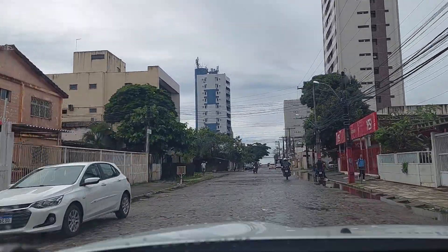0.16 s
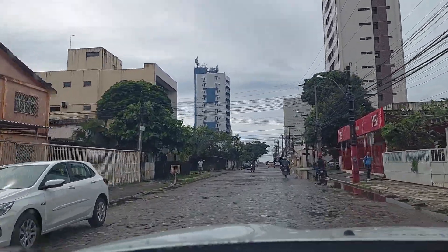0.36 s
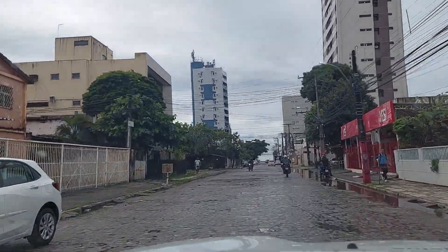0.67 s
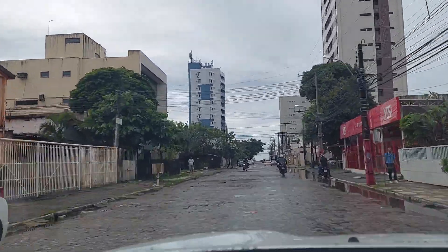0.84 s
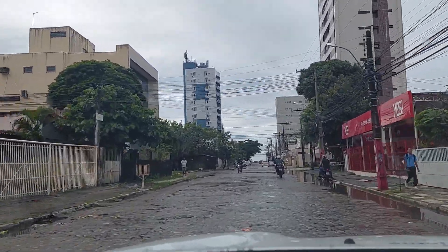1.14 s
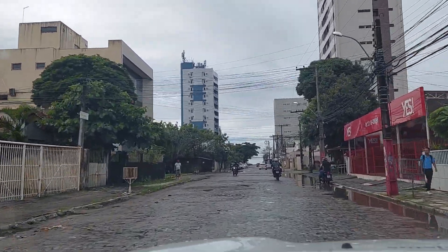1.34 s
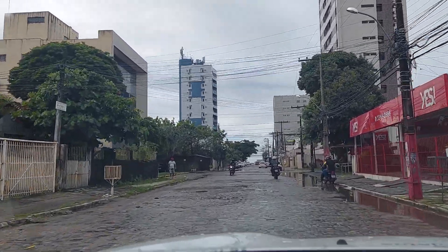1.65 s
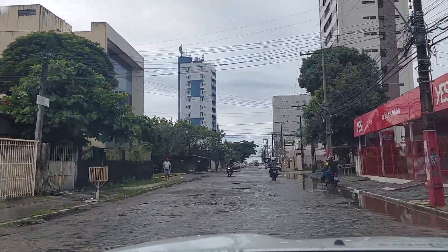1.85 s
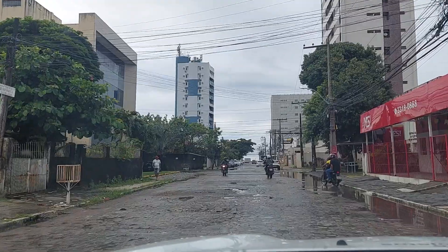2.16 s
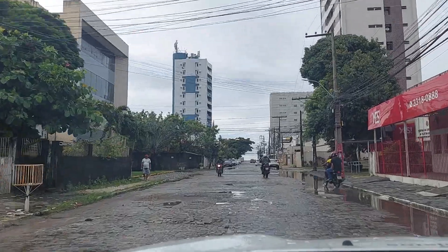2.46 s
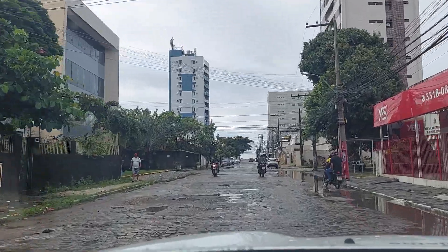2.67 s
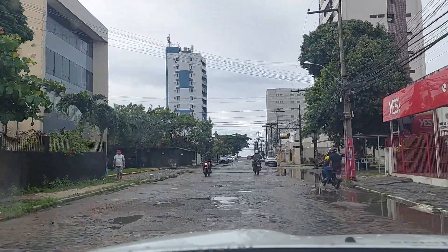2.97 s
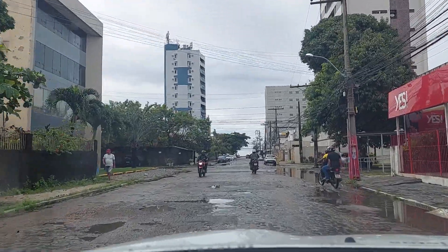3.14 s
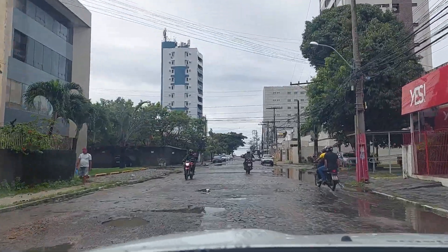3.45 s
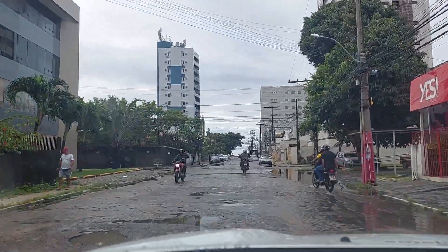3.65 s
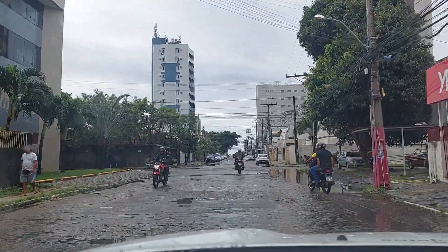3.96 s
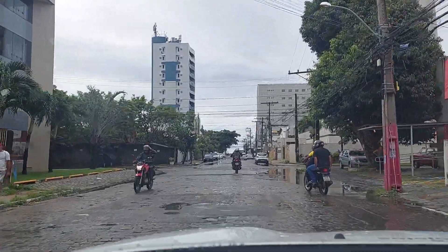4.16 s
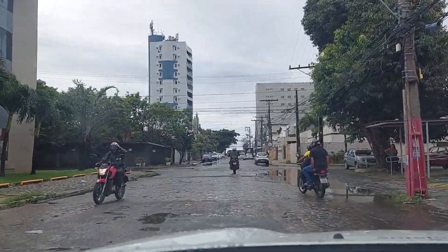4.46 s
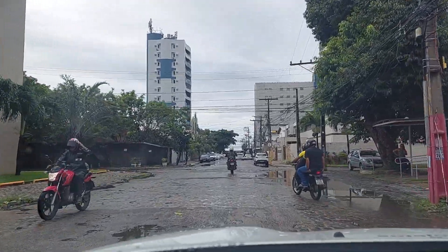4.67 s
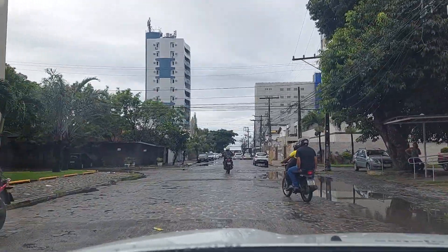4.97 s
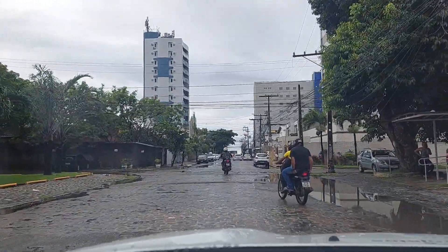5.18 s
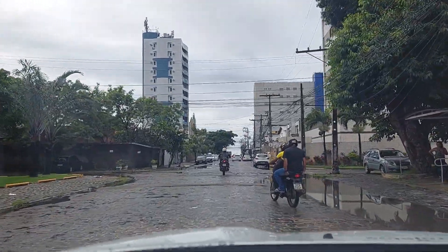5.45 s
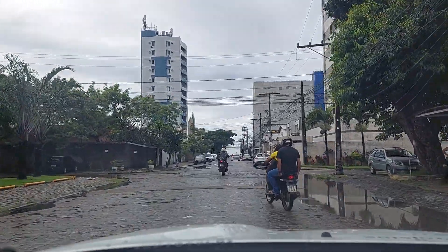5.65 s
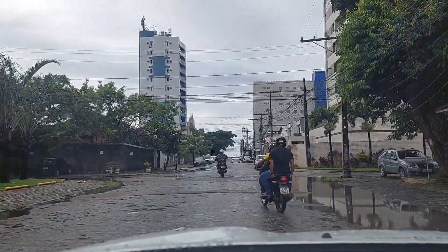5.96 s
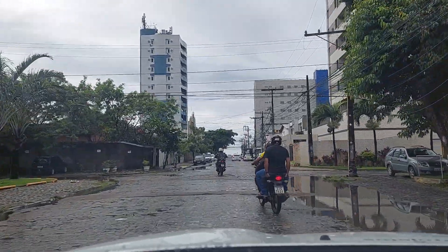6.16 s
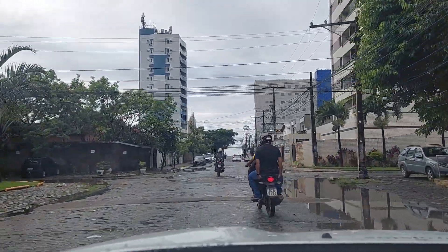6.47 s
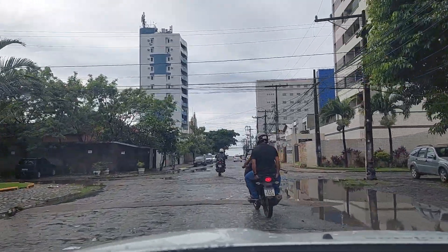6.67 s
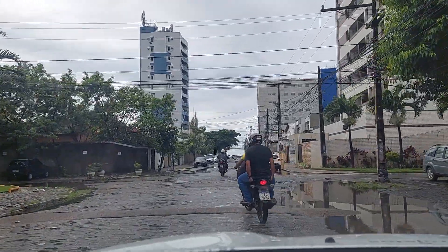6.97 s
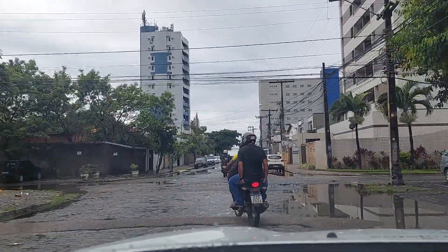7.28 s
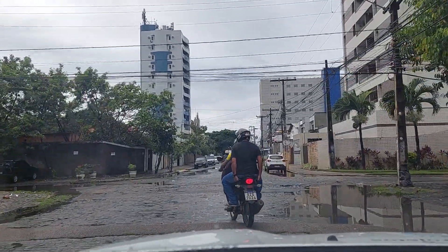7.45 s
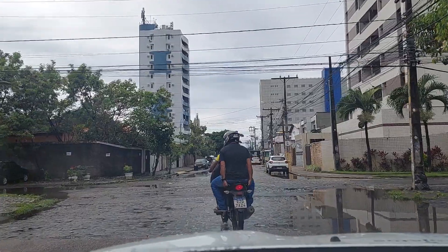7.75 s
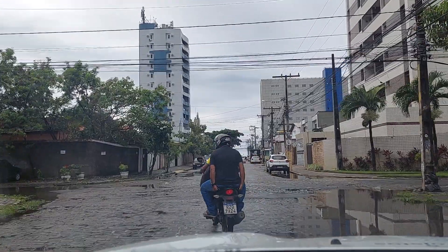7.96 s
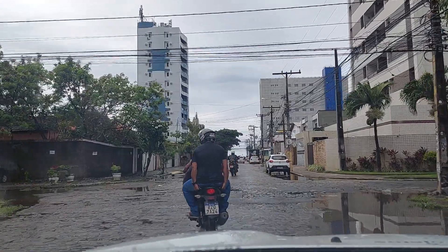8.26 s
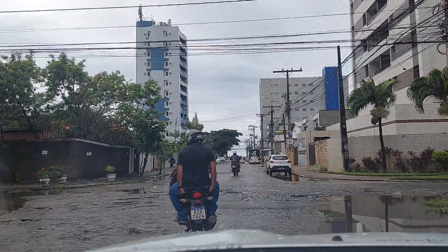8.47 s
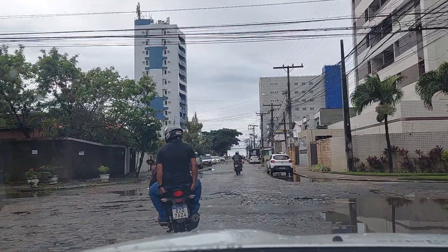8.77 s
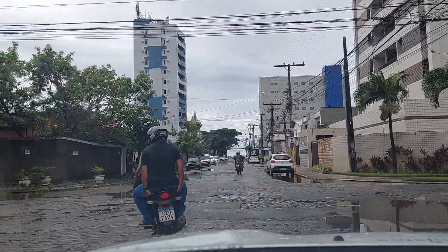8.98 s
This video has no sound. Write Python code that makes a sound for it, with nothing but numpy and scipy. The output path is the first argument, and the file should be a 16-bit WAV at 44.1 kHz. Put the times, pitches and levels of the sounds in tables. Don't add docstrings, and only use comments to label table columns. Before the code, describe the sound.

Close stereo perspective behind the windscreen of a car rolling slowly over wet cobblestones, with a short, dry upholstered cabin response. Throughout, a wavering air boom around 45-50 hertz surges irregularly beneath bumpy tyre rumble and panel drumming; panels briefly hum at low pitches. Faint vent air sits behind. It opens rough, with a hard suspension thump at 0.05 s and crackling trim. A strong plastic knock comes at 0.75, a small bright key ping at 0.98, a softer thump at 1.3. From 2 to 4.6 s short buzzing rattles, taps and clip ticks continue, with a panel clunk at 2.6, a thump at 3.35 and clustered knocks around 4.2. After 5 s it eases, with a sharper knock at 5.56 and a buzz near 6. Knocks cluster at 7.6-7.8, the heaviest thump follows at 7.9, a clunk at 8.3, then quieter rolling and a faint puddle splash at 9.0.

```python
import sys
import numpy as np
from scipy import signal
from scipy.fft import rfft, irfft
from scipy.io import wavfile
from scipy.ndimage import uniform_filter1d

SR = 44100
rng = np.random.default_rng(int(sys.argv[2]) if len(sys.argv) > 2 else 0)


def wav_record(signal):
    frames = np.transpose(np.atleast_2d(signal))
    bounded = np.clip(frames, -1, 1)
    quanta = np.round(bounded * 32767).astype(np.int16)
    wavfile.write(sys.argv[1], SR, quanta)


def level_to_linear(level):
    exponent = np.asarray(level, float) / 20
    return 10 ** exponent


N = 402191
T = np.arange(N) / SR

# (time [s], level [dB])
SPEED = [
    (0, 0.5),
    (1.0, -1.5),
    (2.0, -0.5),
    (4.1, -1),
    (5.3, -3.5),
    (7.4, -2.5),
    (9.12, -3.5),
]
# (time [s], level [dB])
ROUGH = [(0, 11), (.2, -7.5), (.55, 3.5), (.8, 2.5), (1.07, -3.5), (1.5, 4), (2.0, -2.5), (2.64, -2),
         (2.87, -1), (3.5, -2), (4.4, -1.5), (5.05, -8), (5.5, -3), (7.0, -9.5), (7.74, -1), (8.45, -14),
         (8.92, -10), (9.12, 2)]
# (time [s], rumble change [dB], drumming change [dB])
JOLTS = [(.02, 5.5, 4), (.23, -8, -1), (.46, 2, -2), (1.331, 2, 3.5), (2.03, 1.5, -0.5), (3.33, 2.5, -2),
         (4.14, -8.5, -1), (4.818, -1.5, 3.5), (5.5, -1, 4.5), (5.87, 3, 2.5), (6.05, 1.5, 2.5),
         (6.581, 2.5, 0.5), (6.711, 6.5, 2.5), (7.151, 0.5, 2.5), (7.65, 2, 2.5), (7.899, 5, 1.5),
         (8.95, -2.5, 4.5)]
# (start [s], length [s], buzz change [dB])
CHATTER = [(1.409, 0.099, 3.5), (2.139, 0.08, 10), (2.614, 0.065, 8.5), (3.006, 0.049, 8),
           (4.208, 0.071, -9), (4.276, 0.075, 7.5), (4.493, 0.043, 8), (4.653, 0.094, -4),
           (5.188, 0.098, -11.5), (5.97, 0.29, 4.5), (7.451, 0.1293, -11), (7.554, 0.113, 5),
           (7.814, 0.087, 3), (2.701, 0.078, -6.5), (8.408, 0.052, 2), (0.989, 0.052, 5)]
# (frequency [Hz], correlation [-1..1])
PORT_LIKENESS = [(60, 0.98), (180, 0.94), (550, 0.45), (1650, -0.62), (4970, -0.12), (15000, -0.22)]
# (frequency [Hz], left minus right [dB])
PORT_LEAN = [(60, -3), (130, 2.5), (220, -3), (340, 0.5), (1500, -3.5), (2500, 1), (8000, 1.5), (13000, -7)]
# (frequency [Hz], density [dB per Hz])
VENT = [(900, 1), (1300, 7.5), (2620, -11.5), (2820, -23), (3900, -27.5), (4700, -15), (5200, -22),
        (15500, -24.5)]
# (centre [Hz], width [Hz], level [dB])
SPRAY = [(2587, 626, 1), (4370, 880, 2), (7500, 2800, -5), (13000, 3400, -8.5)]
# (time [s], level [dB])
SPRAY_LEVEL = [
    (8.96, -82),
    (8.98, -54),
    (9.01, -64),
    (9.02, -52),
    (9.05, -56.5),
    (9.12, -59),
]
# (time [s], pitch [Hz], level [dB], t60 [s])
KEYS = [
    (0.024, 9800, -56, 0.074),
    (0.977, 13820, -45, 0.057),
    (.978, 8530, -65, 0.19),
    (0.977, 5280, -61, 0.23),
]
# (time [s], level [dB])
GLINTS = [(0.0094, -42.5), (0.049, -52), (0.0957, -53), (0.399, -57), (0.4978, -52), (0.5302, -52),
          (0.5606, -50), (0.5926, -51), (0.6255, -52), (0.7492, -44), (0.8779, -50), (1.1136, -59),
          (1.2547, -62), (1.4102, -50), (1.5335, -47), (1.5648, -51), (1.693, -50), (1.725, -56),
          (2.1523, -55), (2.4529, -53), (2.4998, -55), (3.0164, -51), (3.0894, -55), (3.4191, -50),
          (3.6384, -50), (4.1974, -49), (4.5226, -51)]
# (frequency [Hz], level [dB], t60 [s])
CLIP = [(5300, -2, .007), (6960, 0, .012), (7800, -3, .008), (9200, -6, .005), (11100, -2, .009),
        (13500, -12, .005)]
# (time [s], level [dB])
TICKS = [(0.508, -38.5), (.7297, -39), (.7756, -35), (.8779, -46), (0.9778, -47), (1.3029, -32.5),
         (1.6211, -34.5), (2.0602, -41.5), (2.6293, -42), (2.806, -46), (3.025, -40.5), (3.3711, -40),
         (3.673, -40.5), (4.148, -43), (4.284, -38), (4.3236, -36), (5.4307, -43.5), (5.5463, -50),
         (6.2455, -44), (6.3149, -44.5), (6.4015, -45), (6.6603, -45.5), (6.7498, -45.5), (6.8391, -46.5),
         (6.9561, -47), (7.5588, -43.5), (8.0452, -39.5), (8.1261, -40), (8.2466, -44.5), (8.917, -42.5)]
# (time [s], level [dB])
SOFT_TICKS = [(0.1521, -57), (0.4564, -55), (0.6464, -47), (0.8658, -57), (1.1144, -56), (1.435, -44),
              (1.5334, -49), (1.6831, -53), (2.1529, -45), (2.209, -57), (2.3595, -53), (2.4544, -57),
              (2.8809, -53), (3.088, -55), (3.249, -49), (3.4289, -46), (3.4938, -52), (3.5369, -64),
              (3.5743, -59), (3.636, -50), (3.7451, -50), (3.912, -53), (3.9915, -56), (4.0277, -62),
              (4.0634, -55), (4.5224, -54), (5.5145, -62), (5.6037, -53), (5.6455, -54), (5.9748, -56),
              (6.0167, -55), (6.115, -51), (6.784, -61), (6.9082, -55), (7.006, -59), (7.1455, -60),
              (7.1676, -59), (7.196, -52), (7.9344, -54), (7.9977, -54), (8.1788, -55), (8.2731, -54),
              (8.4943, -60), (8.5522, -54.5), (8.5942, -54.5), (8.6967, -57), (8.748, -55), (8.7834, -54),
              (8.8169, -52.5), (8.975, -55), (9.0171, -50), (9.0348, -51)]
# (time [s], level [dB], pitch [Hz])
THUMPS = [
    (0.045, -17, 142),
    (1.319, -21.5, 137.5),
    (3.355, -23, 161.7),
    (7.637, -21, 138.3),
    (7.877, -16.5, 153.6),
]
# (time [s], level [dB], pitch [Hz])
CLUNKS = [
    (2.456, -32, 330),
    (2.64, -23, 290),
    (4.299, -28, 360),
    (6.705, -43, 290),
    (7.875, -46, 295),
    (8.321, -28.5, 308.4),
    (8.931, -28.5, 428.6),
    (8.983, -43, 587),
    (8.983, -43, 984),
]
# (frequency [Hz], level [dB])
CRACKLE = [(1500, -4.5), (2400, -2), (3600, -9)]
# (frequency [Hz], density [dB per Hz])
BUZZ = [(530, -18), (900, -10.5), (1060, -3), (1600, -2), (1900, -11), (2650, -9), (2950, -16.5),
        (3900, -18), (4820, -16), (5980, -31), (7080, -24), (8990, -31.5), (11000, -29), (15800, -29.5)]
# (frequency [Hz], level [dB], t60 [s])
TRIM_LOW = [(1120, 1.5, .016), (1400, -3, .012), (1570, 3, .016), (2420, -5, .009)]
# (frequency [Hz], level [dB], t60 [s])
TRIM_HIGH = [(2720, -1, .008), (3370, 1.5, .009), (3650, -3, .007), (4100, -6, .007), (4480, -7, .007)]
# (time [s], level [dB], upper ring [dB])
KNOCKS = [(0.0442, -33, -11), (0.084, -31, -15), (0.7073, -32, -20), (0.748, -18.5, -15), (0.791, -24, -10),
          (1.3421, -30.5, -9), (1.428, -35, -8), (2.1912, -27, -24), (2.335, -31, -9),
          (2.4579, -30.5, -13.5), (2.9898, -27, -7), (3.128, -31, -11), (3.413, -31.5, -6),
          (3.5857, -31, -16), (4.112, -31, -8), (4.154, -29.5, -8), (4.1976, -29.5, -4.5),
          (4.2909, -30, -4.5), (4.369, -29.5, -11), (5.03, -29, -5), (5.5578, -23.5, -10.5),
          (5.881, -28, -11.5), (6.059, -26.5, -7), (7.232, -29.5, -10.5), (7.635, -28, -7),
          (7.667, -31.5, -2), (7.699, -28, -5.5), (7.734, -27, -4.5), (7.76, -30.5, -6),
          (8.1509, -31, -10.5)]
# (time [s], level [dB])
TAPS = [(.392, -29.5), (0.621, -31), (1.062, -31), (1.559, -36), (1.5924, -29.5), (2.065, -33.5),
        (2.5928, -37), (2.8965, -31), (3.0746, -31.5), (3.3635, -33), (3.716, -34.5), (3.893, -32),
        (4.515, -28), (4.56, -30), (4.843, -35.5), (5.5175, -29), (5.5927, -33), (5.679, -32.5),
        (6.208, -40.5), (6.284, -42), (6.542, -36), (2.914, -40), (8.056, -31.5), (8.0854, -38),
        (8.115, -31.5), (8.6476, -37)]
# (time [s], level [dB])
CRACKS = [(0.6586, -31), (0.9136, -38.5), (1.278, -36), (1.659, -35), (2.145, -44), (2.404, -35),
          (2.8503, -35.5), (3.255, -36), (3.328, -37), (3.829, -35.5), (3.928, -33.5), (3.967, -33),
          (4.092, -39), (4.9807, -38.5), (5.313, -45), (5.3518, -39), (5.3818, -37.5), (5.844, -38.5),
          (4.314, -44), (2.977, -40), (7.598, -36), (8.9755, -57)]
# (time [s], level [dB], upper ring [dB])
PATTER = [(0.1226, -40, -20), (0.4379, -34.5, -16), (0.838, -37, -23), (0.9892, -39, -13),
          (1.0969, -41, -9), (1.1508, -49, -13), (1.3774, -43.5, -7), (1.3957, -44, -10),
          (1.5035, -36, -16), (1.7099, -34, -16), (1.723, -41, -22), (1.7579, -41, -2), (1.8729, -46, -7),
          (1.9754, -37, -8.5), (2.0449, -42, -6), (2.4458, -50, -21), (2.4965, -35, -22),
          (2.5439, -40, -15), (2.7574, -41, -10), (2.9243, -32.5, -12), (3.1657, -60, -14),
          (3.2121, -44, -6), (3.2952, -32, -21), (3.4336, -41, -15), (3.4496, -44, -20), (3.494, -33, -10),
          (3.5994, -42, -16), (3.6363, -33, -16), (3.6785, -33, -7), (4.0547, -38, -20), (4.2494, -42, -21),
          (4.273, -44, -22), (4.5022, -46, -16), (5.151, -55, 4.5), (5.427, -44, -17), (5.456, -59, -16),
          (5.473, -42, -4), (5.5723, -31, -17), (5.6088, -34, -12), (5.7548, -53, -17), (5.8917, -48, -13),
          (5.9599, -45, -16), (6.5557, -35, -23), (6.574, -41, -17), (6.6306, -42, -18),
          (6.7895, -38.5, -24), (7.3008, -41, -25), (7.7843, -41, -19), (7.817, -40, -22),
          (7.875, -41, -15), (7.9049, -36, -20), (7.9733, -51, -25), (8.1868, -43, -18), (8.31, -45, -17),
          (8.6267, -42, -19.5)]
# (peak time [s], level [dB], pitch [Hz])
HUMS = [(0.052, -32, 170), (0.434, -15.5, 102.6), (0.46, -27.5, 226), (0.918, -19, 94.1),
        (1.281, -16, 94.2), (1.355, -16, 133), (1.356, -32, 278.4), (1.367, -30, 221), (1.435, -17, 107),
        (1.469, -22.5, 223), (1.494, -30.5, 335), (1.519, -22.5, 152), (1.546, -24.5, 300),
        (1.592, -17, 114), (1.648, -21.5, 162), (1.683, -30, 259), (1.794, -15.5, 84.9),
        (2.004, -15.5, 87.1), (2.188, -20, 124), (2.238, -19, 222), (2.285, -22, 127), (2.295, -33.5, 333),
        (2.341, -32, 163), (2.386, -24.5, 233), (2.481, -23, 219.4), (2.533, -16.5, 123),
        (2.659, -28, 302.2), (2.696, -24.5, 219), (2.873, -31.5, 332), (3.004, -13.5, 91.2),
        (3.065, -26.5, 236), (3.306, -18.5, 130), (3.37, -21, 214), (3.37, -39, 166), (3.386, -12.5, 96.3),
        (3.522, -18.5, 99.7), (3.54, -28.5, 290.7), (3.558, -20.5, 221), (4.191, -23.5, 221.2),
        (4.305, -22.5, 206.7), (4.538, -24.5, 218.4), (4.734, -18.5, 97.4), (4.773, -27.5, 168.2),
        (4.83, -12, 91.5), (5.842, -22, 128), (5.902, -23.5, 128.7), (6.189, -17.5, 129),
        (6.325, -18.5, 130), (6.584, -14, 90), (7.621, -32, 335), (7.648, -25.5, 263), (7.678, -17.5, 129),
        (7.863, -28.5, 294.4), (7.887, -30, 174), (7.898, -22.5, 204), (8.939, -31, 184.5)]
# (start [s], length [s], level [dB], pitch [Hz])
SURGES = [(0.002, 0.23, -16, 46.54), (0.296, 0.056, -17.5, 44.1), (0.47, 0.14, -19, 47.15),
          (0.631, 0.19, -19.5, 47.6), (0.832, 0.055, -30, 42.7), (0.961, 0.22, -17, 50.1),
          (1.239, 0.11, -16.5, 47.42), (1.448, 0.16, -17.5, 50.3), (1.611, 0.29, -15.5, 46.1),
          (1.994, 0.188, -18.5, 46.6), (2.495, 0.19, -17.5, 47.4), (2.691, 0.11, -19, 46.34),
          (2.998, 0.083, -19.5, 48.25), (3.17, 0.13, -20, 46.77), (3.335, 0.091, -19, 48.76),
          (3.466, 0.19, -16.5, 48.3), (3.805, 0.19, -19.5, 46.4), (4.04, 0.29, -19, 46.3),
          (4.575, 0.077, -19, 45.2), (4.749, 0.045, -18.5, 47.1), (5.056, 0.03, -20, 46.2),
          (5.529, 0.069, -17.5, 47.84), (6.29, 0.058, -17.5, 47.8), (7.243, 0.16, -19, 47.95),
          (7.481, 0.12, -18.5, 48.15), (8.193, 0.027, -13, 45.34), (8.699, 0.15, -19.5, 47.13),
          (8.93, 0.14, -19, 48.8)]
# (frequency [Hz], density [dB per Hz])
ROAD = [(12, -43.5), (20, -25), (32, -17), (43, 0.5), (54, 2), (95, -4.5), (138, -11), (182, -21.5),
        (225, -17), (334, -24.5), (434, -34), (487, -38.5), (555, -38), (1000, -50.5), (1300, -73.5),
        (2200, -120)]
# (centre [Hz], width [Hz], level [dB])
PANELS = [(76.2, 2.5, -3), (94.2, 6.1, 10), (142.1, 15.6, 4.5), (220.5, 12.3, 3.5), (290, 19, 1.5),
          (487.3, 20, 7), (1103, 52, 14)]


def evened(x):
    return x / np.sqrt(np.mean(x ** 2) + 1e-20)


def octaves(hz, ref_hz):
    return np.log2((hz + 1) / ref_hz)


def read(points, hz):
    f, value = np.transpose(points)
    return np.interp(np.log(hz + 1), np.log(f + 1), value)


def along(rows, t):
    return np.interp(t, *np.transpose(rows))


def chatter_db(t):
    edge_s = 0.0048
    return sum(db * np.clip(np.minimum(t - s, s + length_s - t) / edge_s, 0, 1)
               for s, length_s, db in CHATTER)


def jolt_db(t, column):
    width_s = 0.043
    return sum(row[column] * np.exp(-((t - row[0]) / width_s) ** 2) for row in JOLTS)


def patchy(shape, bins, frames):
    field = uniform_filter1d(rng.standard_normal(shape), bins, 0)
    return evened(uniform_filter1d(field, frames, 1))


def grid(size):
    hop = size // 4
    return np.fft.rfftfreq(size, 1 / SR), np.arange(N // hop + 5) * hop / SR


def noise_pair(field_db, hz, size, lag_s):
    a, b, c, d = rng.standard_normal((4,) + field_db.shape)
    same = np.clip(read(PORT_LIKENESS, hz), -1, 1)[:, None]
    lag = np.exp(-2j * np.pi * hz * lag_s)[:, None]
    right = a + 1j * b
    left = same * right * lag + np.sqrt(1 - same ** 2) * (c + 1j * d)
    lean = level_to_linear(read(PORT_LEAN, hz) / 2)[:, None]
    z = np.array([left * lean, right / lean]) * level_to_linear(field_db)
    return signal.istft(z, nperseg=size, noverlap=size * 3 // 4)[1][:, :N]


def ring(modes, rise_s):
    t, out = np.arange(850) / SR, 0
    for hz, db, t60_s in modes:
        chance = rng.standard_normal((2, 3))
        level = level_to_linear(db + np.sqrt(2) * chance[:, 1:2] - 60 * t / t60_s)
        pitch_hz = hz * (1 + 0.012 * chance[0, 0])
        out = out + level * np.sin(2 * np.pi * pitch_hz * t + 0.96 * chance[:, 2:])
    return out * (1 - np.exp(-t / rise_s)) / abs(out).max()


def snap(lo_hz, hi_hz, decay_s):
    t, jf = np.arange(600) / SR, 1j * np.fft.rfftfreq(1024, 1 / SR)
    burst = rng.standard_normal((2, len(t))) * np.exp(-t / decay_s) * (1 - np.exp(-t / 0.00027))
    low, high = jf / lo_hz, jf / hi_hz
    highpass = low ** 2 / (1 + np.sqrt(2) * low + low ** 2)
    lowpass = 1 / (1 + np.sqrt(2) * high + high ** 2)
    burst = irfft(rfft(burst, 1024) * (highpass * lowpass) ** 2)[:, :len(t)]
    return burst / abs(burst).max()


def add(mix, s, sound):
    part = mix[:, round(s * SR):][:, :sound.shape[1]]
    part += sound[:, :part.shape[1]]


def vents():
    hz, t = grid(256)
    colour_db = -25 + read(VENT, hz) + 20 * np.minimum(octaves(hz, 1100), 0)
    field_db = colour_db[:, None] + np.zeros(len(t))
    return level_to_linear(-58) * noise_pair(field_db, hz, size=256, lag_s=0.0001)


def spray():
    out, start_s = np.zeros((2, N)), SPRAY_LEVEL[0][0]
    hz, t = np.fft.rfftfreq(256, 1 / SR), start_s + np.arange(160) * 64 / SR
    colour = sum(level_to_linear(db) * np.exp(-((hz - f) / width) ** 2) for f, width, db in SPRAY)
    field_db = 20 * np.log10(colour + 1e-4)[:, None] + along(SPRAY_LEVEL, t)
    add(out, start_s, level_to_linear(-17) * noise_pair(field_db, hz, size=256, lag_s=0.0001))
    return out


def keys():
    out, t = np.zeros((2, N)), np.arange(6000) / SR
    for s, hz, db, t60_s in KEYS:
        add(out, s, level_to_linear(db - 60 * t / t60_s + [[-3.5], [1.5]]) * np.sin(2 * np.pi * hz * t))
    return out


def glints():
    out = np.zeros((2, N))
    for s, db in GLINTS:
        add(out, s, level_to_linear(db + np.array([[2.5], [9]])) * snap(13000, 17000, decay_s=0.0037))
    return out


def clip_ticks():
    out = np.zeros((2, N))
    soft = [(s, db + 5.5) for s, db in SOFT_TICKS]
    knocked = [(s, db + upper_db - 7.5) for s, db, upper_db in KNOCKS]
    for s, db in TICKS + soft + knocked:
        add(out, s, level_to_linear(db + 3) * ring(CLIP, rise_s=0.0013))
        add(out, s, level_to_linear(db - 5) * snap(3300, 11000, decay_s=0.005))
        add(out, s, level_to_linear(db + np.array([[-20], [-12]])) * snap(11500, 15700, decay_s=0.003))
    return out


def thumps():
    out, t = np.zeros((2, N)), np.arange(6000) / SR
    for s, db, hz in THUMPS + CLUNKS:
        level = level_to_linear(db + 4.5 - 60 * t * hz / 15 + [[-.6], [.6]])
        add(out, s, level * (1 - np.exp(-t / 0.00026)) * np.sin(2 * np.pi * hz * t))
    return out


def crackle():
    out, grains_per_s, spread_db = np.zeros((2, N)), 110, 3.5
    for hz, db in CRACKLE:
        at = np.flatnonzero(rng.random(N) < grains_per_s / SR)
        train = np.zeros(N)
        train[at] = level_to_linear(db + spread_db * np.minimum(rng.exponential(1, len(at)), 4))
        grain = snap(hz / np.sqrt(2), hz * np.sqrt(2), decay_s=0.0019)
        out += signal.oaconvolve(train[None], grain, axes=1)[:, :N]
    t = T[::64]
    return out * np.interp(T, t, level_to_linear(-52.5 + along(ROUGH, t) + chatter_db(t)))


def buzz():
    hz, t = grid(256)
    speed_db, rough_db = along(SPEED, t), along(ROUGH, t)
    contacts = np.minimum(rng.exponential(1, len(t)), np.sqrt(3)) ** 2 * (rng.random(len(t)) < .16)
    flicker_db = 10 * np.log10(0.38 + signal.lfilter([1], [1, -.52], contacts))
    patches_db = np.sqrt(3) * patchy((len(hz), len(t)), 8, 20)
    upper = np.clip(octaves(hz, 3500) / 1.6, 0, 1)[:, None]
    grit_db = 3 + 0.38 * rough_db
    level_db = (1 - upper) * rough_db + upper * grit_db + (1 - upper / 3) * chatter_db(t)
    sheen = 1.5 * np.clip(hz / 4000 - 2.4, 0, 1)
    tread = 1.6 * np.exp(-octaves(hz, 3200) ** 2)
    level_db = level_db + (sheen + tread)[:, None] * speed_db
    level_db = level_db + np.clip(hz / 2500, 0, 1)[:, None] * flicker_db + patches_db
    colour_db = read(BUZZ, hz) + 20 * np.minimum(octaves(hz, 1100), 0)
    return level_to_linear(-58) * noise_pair(colour_db[:, None] + level_db, hz, size=256, lag_s=0.0001)


def knocks():
    out = np.zeros((2, N))
    taps = [(s, db, -16.5) for s, db in TAPS]
    cracks = [(s, db, -3) for s, db in CRACKS]
    for s, db, upper_db in KNOCKS + taps + cracks + PATTER:
        add(out, s, level_to_linear(db - 2) * ring(TRIM_LOW, rise_s=0.0006))
        add(out, s, level_to_linear(db - 7) * snap(750, 2000, decay_s=0.003))
        add(out, s, level_to_linear(min(db, -29) - 3) * snap(210, 840, decay_s=0.0061))
        add(out, s, level_to_linear(db + upper_db + 5.5) * ring(TRIM_HIGH, rise_s=0.0005))
        add(out, s, level_to_linear(db + upper_db + 1) * snap(2300, 4300, decay_s=0.0016))
    return out * level_to_linear([[-1.1], [1.1]])


def hums():
    out = np.zeros((2, N))
    for s, db, hz in HUMS:
        half_s = 0.02263 + 1.12 / hz
        t = np.arange(-1.8 * half_s, 1.8 * half_s, 1 / SR)
        tone = np.sqrt(2) * np.sin(2 * np.pi * (hz * t + rng.random()) + [[-.12], [0]])
        add(out, max(s + t[0], 0), level_to_linear(db - 4) * np.exp(-(t / half_s) ** 2 * 2) * tone)
    return out


def boom():
    swell_s, between_db = 0.056, -26
    waver = uniform_filter1d(rng.standard_normal((2, N)), 1500)
    pitch_waver, level_waver = evened(uniform_filter1d(waver, 1500))
    start_s, length_s, _, hz = np.transpose(SURGES)
    pitch_hz = np.interp(T, start_s + length_s / 2, hz) + 3.047 * pitch_waver
    tone = np.sqrt(2) * np.sin(2 * np.pi * np.cumsum(pitch_hz) / SR + [[-.15], [0]])
    t = T[::64]
    size = level_to_linear(between_db + along(SPEED, t))
    for s, long_s, db, _ in SURGES:
        swell = np.clip(np.minimum(t - s, s + long_s - t) / swell_s + .5, 0, 1)
        size = np.maximum(size, level_to_linear(db) * swell)
    return tone * np.interp(T, t, size) * level_to_linear(1.1 * level_waver + [[-1.1], [1.1]])


def road():
    hz, t = grid(2048)
    speed_db, rough_db = along(SPEED, t), along(ROUGH, t)
    rumble_db = -23.5 + speed_db + jolt_db(t, column=1)
    drum_db = -21.5 + 0.92 * speed_db + 0.24 * rough_db + jolt_db(t, column=2)
    upper = np.clip(octaves(hz, 150) / 0.71, 0, 1)[:, None]
    level_db = (1 - upper) * rumble_db + upper * drum_db
    level_db = level_db + 1.48 * patchy(level_db.shape, 5, 8)
    shaken_db = rough_db + 4.5 + chatter_db(t)
    level_db = level_db + np.clip(octaves(hz, 300) * 0.29, 0, .7)[:, None] * shaken_db
    panels_db = sum(db * np.exp(-((hz - f) / width) ** 2) for f, width, db in PANELS)
    notch_db = -12 * np.exp(-((hz - 48) / 11) ** 2)
    tilt_db = -4.8 * np.maximum(octaves(hz, 900), 0)
    colour_db = read(ROAD, hz) + panels_db + notch_db + tilt_db
    return level_to_linear(1.0) * noise_pair(colour_db[:, None] + level_db, hz, size=2048, lag_s=0.000064)


def cabin(x):
    t, out = np.arange(3000) / SR, 0
    for turn in np.arange(6) / 6:
        tail = rng.standard_normal((2, len(t))) * level_to_linear(-60 * t / .085) * (t > .0025)
        share = np.maximum(np.cos(2 * np.pi * (T * 3.1 + turn)), 0) ** 2
        out = out + signal.oaconvolve(x * share, tail / np.linalg.norm(tail[0]), axes=1)[:, :N]
    return out


def scene():
    steady = vents() + spray() + crackle() + buzz() + hums() + boom() + road()
    hits = keys() + glints() + clip_ticks() + thumps() + knocks()
    return steady + hits + level_to_linear(-7.5) * cabin(hits)


def band_limit(x):
    return signal.sosfilt(signal.butter(12, 16280, fs=SR, output="sos"), x)


def record(dry):
    edge = signal.firwin(511, 15740, window=("kaiser", 9), fs=SR)
    eased = dry * np.tanh(T / .004)
    return band_limit(signal.oaconvolve(eased, edge[None], "same"))


dry = scene()
out = record(dry)
wav_record(out)
```